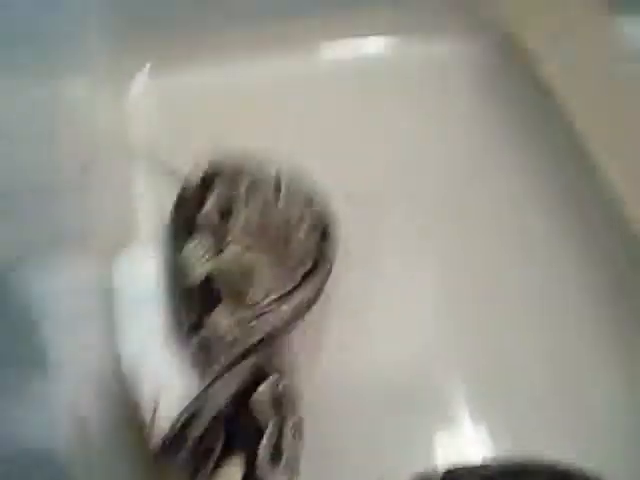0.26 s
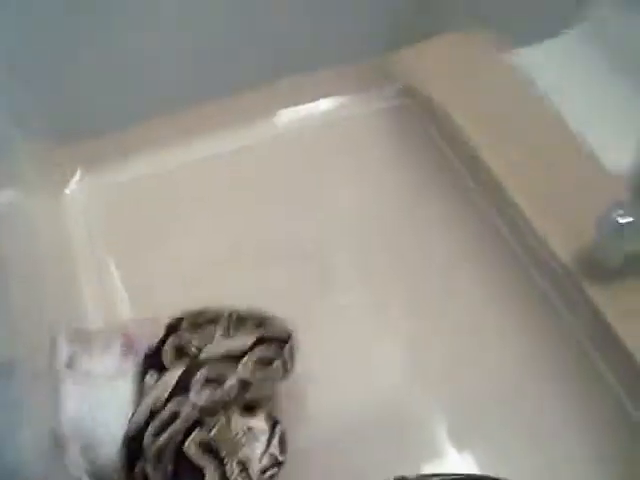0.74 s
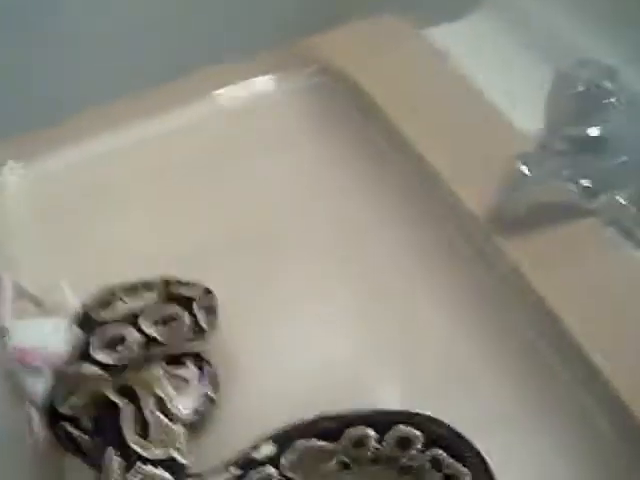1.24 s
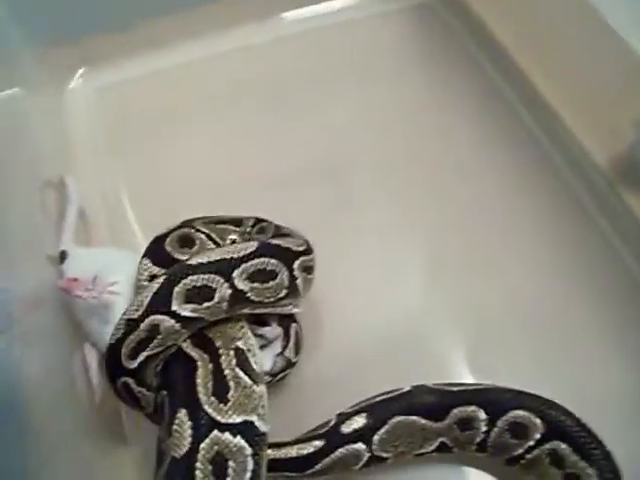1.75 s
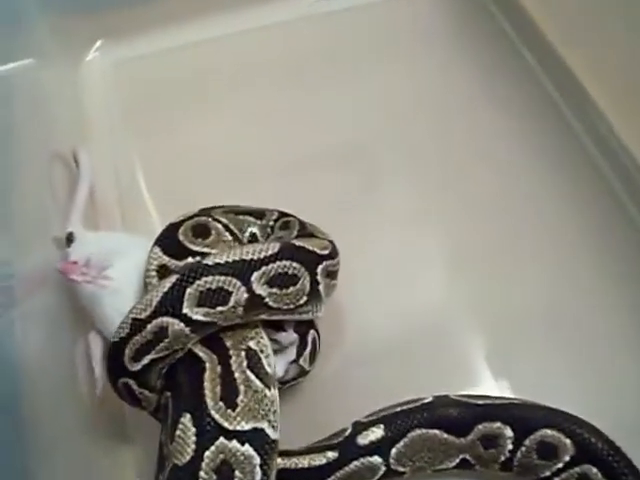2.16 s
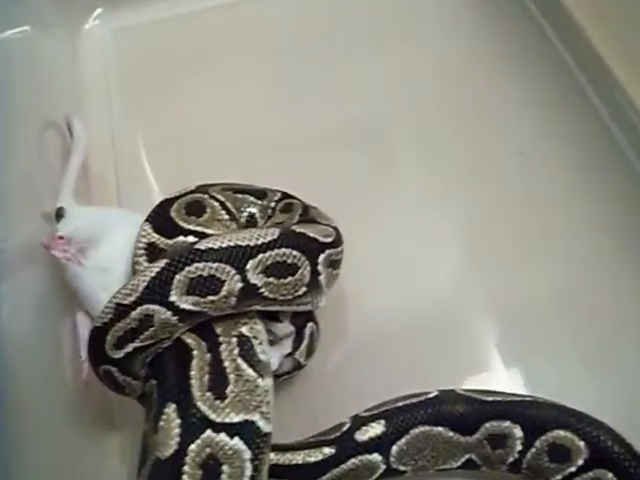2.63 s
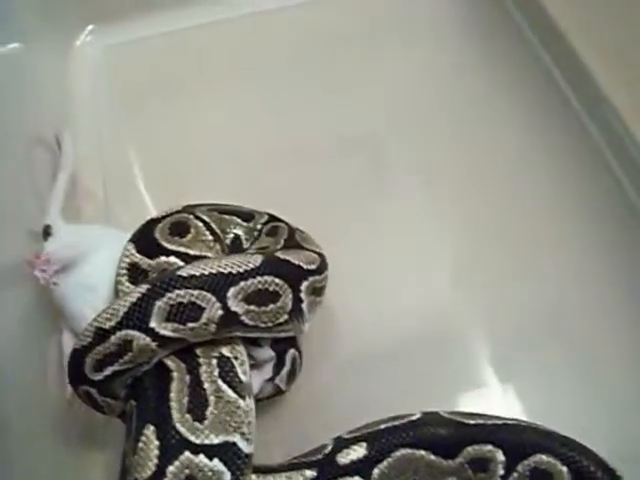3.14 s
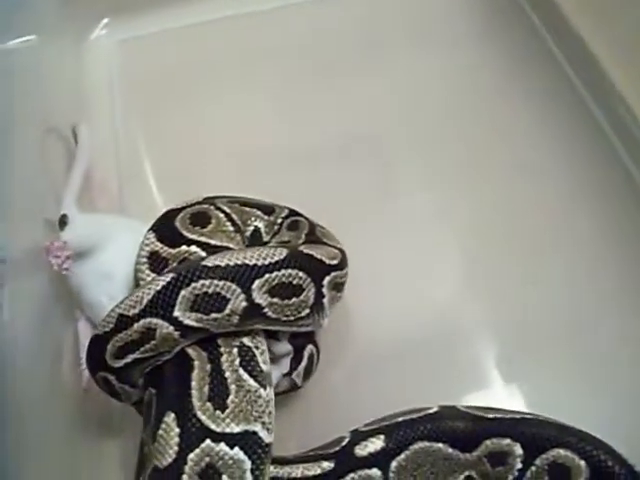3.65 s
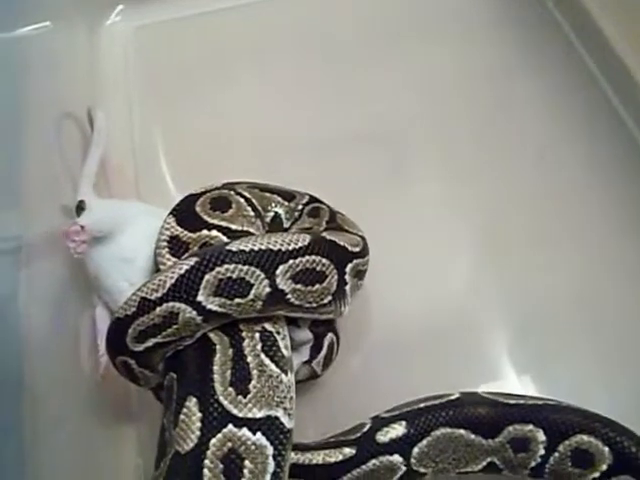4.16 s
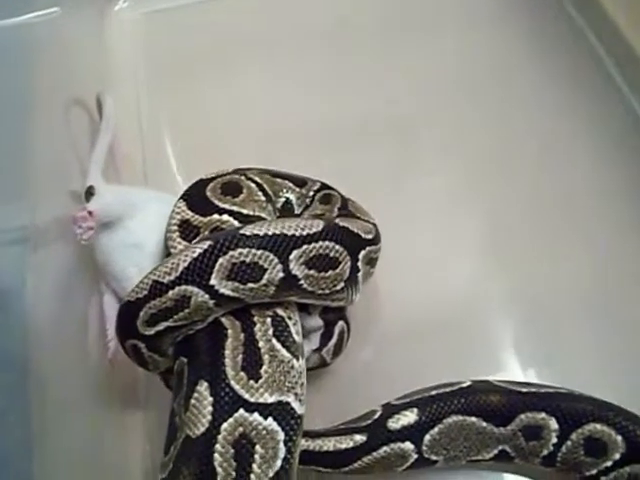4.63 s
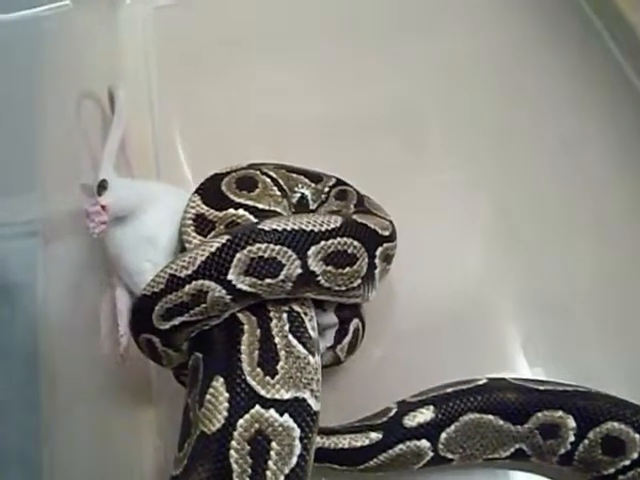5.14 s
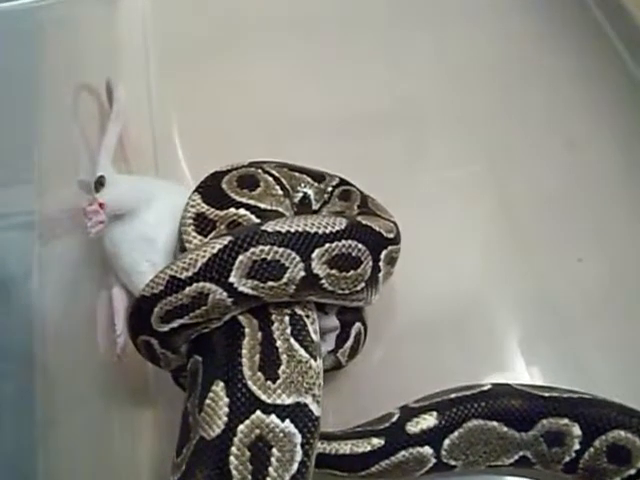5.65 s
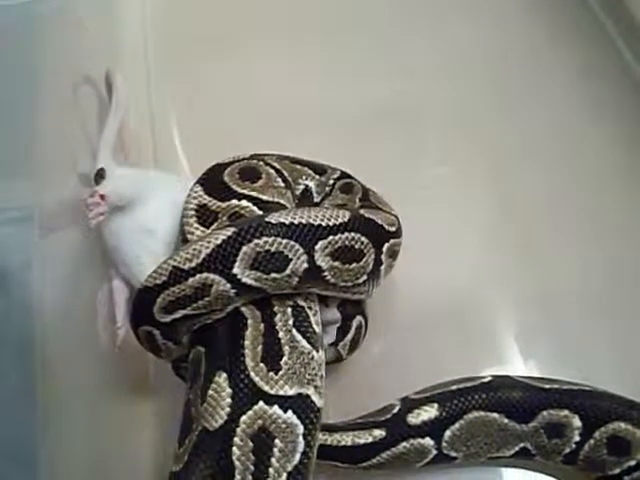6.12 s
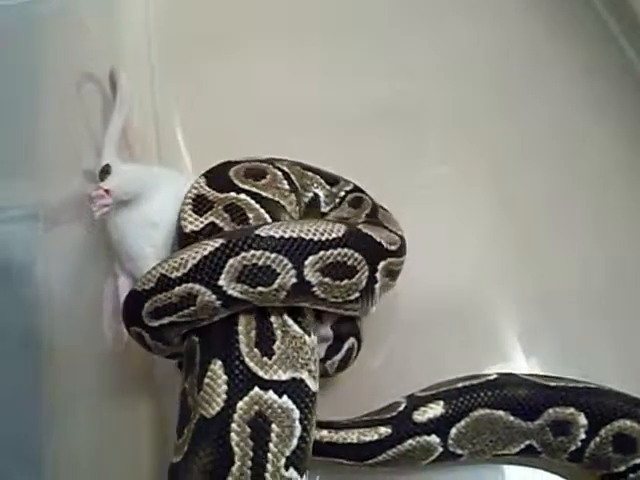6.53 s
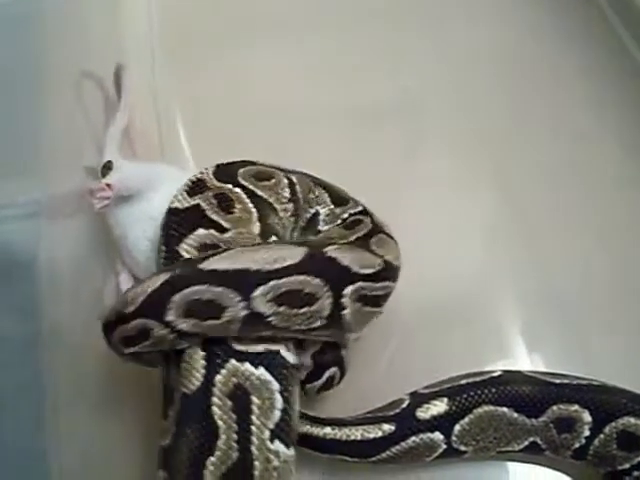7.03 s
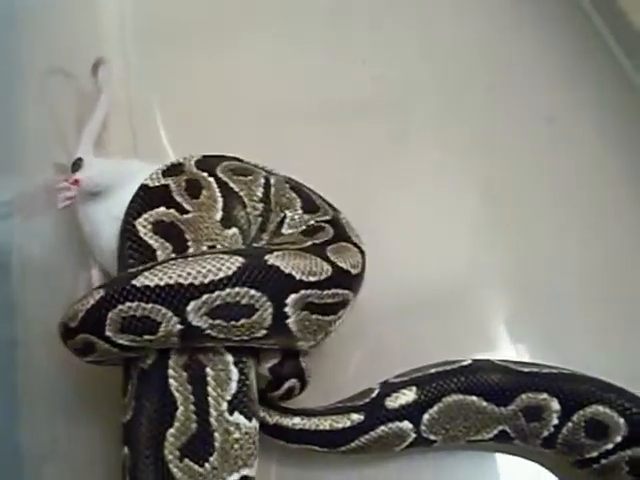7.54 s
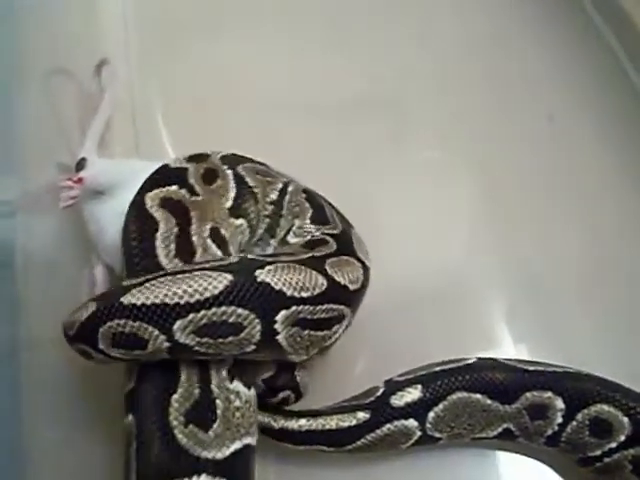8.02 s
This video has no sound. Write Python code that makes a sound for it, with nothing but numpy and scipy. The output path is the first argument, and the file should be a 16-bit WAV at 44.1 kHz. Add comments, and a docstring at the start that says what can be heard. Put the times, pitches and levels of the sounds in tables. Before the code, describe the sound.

A snake seizes a small rodent in a plastic tub. At about 0.1 seconds a harsh screech breaks out over hollow knocks, sharp claw ticks and soft sliding scales. More thumps and short squeaks follow until 0.8 seconds. A high squeal comes from 1 to 1.2 seconds with another knock and tick, and the scuffle fades to faint taps by 2 seconds. From 1.5 to 4.5 seconds the rodent gives brief, thin, quieter squeaks, about three a second, then a slightly longer one near 4.8. After a pause and one faint knock, five loud squeals come in a row from 6.3 to 8.2 seconds, each whistling and turning hoarse as its pitch drops. The sound is close and narrow in range, in a small hard room with faint hum and slight handling rumble near the end.

```python
"""Knocks, scrapes and a harsh screech: a snake seizes a small rodent in a plastic tub.
Bodies ring the tub's modes, claws tick, scales slide. The rodent's throat whistles short squeaks
and longer squeals that turn harsh where the pitch sags, ending with five loud squeals in a row.
Small hard room, faint hum, heard through a close, narrow-band pocket camera."""
import sys
import numpy as np
from scipy import signal
from scipy.fft import rfft, irfft, next_fast_len
from scipy.io import wavfile

SR = 44100
rng = np.random.default_rng(int(sys.argv[2]) if len(sys.argv) > 2 else 0)


def master_out(mix):
    """Clip the mix to full scale and print it as 16-bit PCM to the path in sys.argv[1]."""
    frames = np.transpose(np.atleast_2d(mix))
    ceiling = np.clip(frames, -1, 1)
    pcm = np.round(ceiling * 32767).astype(np.int16)
    wavfile.write(sys.argv[1], SR, pcm)


N = 365148
T = np.arange(N) / SR

# one curve per squeal: t/s, f/Hz, level/dB
SQUEAL_CURVES = [
    [(0.99, 3280, -30), (1.0, 3276, -27.5), (1.012, 3430, -29.5), (1.026, 3495, -24.5),
     (1.078, 3284, -28.5), (1.084, 3284, -28.5), (1.118, 3295, -30), (1.176, 3392, -28.5),
     (1.21, 3365, -28.5), (1.224, 2883, -31), (1.242, 2120, -40), (1.247, 2120, -41)],
    [(4.834, 3070, -41), (4.842, 3320, -36.5), (4.854, 3288, -37.5), (4.872, 3268, -30),
     (4.894, 3206, -38.5), (4.914, 3056, -30.5), (4.922, 2940, -36.5), (4.934, 2820, -36.5),
     (4.94, 2575, -51), (4.944, 2500, -50)],
    [(6.263, 3200, -36), (6.271, 3350, -34), (6.295, 3258, -27), (6.305, 3052, -22.5), (6.363, 3065, -23.5),
     (6.379, 2913, -31), (6.409, 3110, -20.5), (6.421, 2900, -29), (6.447, 3070, -24.5),
     (6.465, 2364, -24.5), (6.471, 2387, -38), (6.483, 2750, -25)],
    [(6.738, 2944, -25.5), (6.746, 2760, -22), (6.758, 3280, -22.5), (6.774, 3292, -18), (6.784, 3440, -25),
     (6.834, 3474, -24), (6.94, 3514, -26.5), (6.994, 3510, -33.5), (7.004, 3434, -25),
     (7.034, 3260, -20.5), (7.042, 2970, -26.5), (7.056, 3080, -30)],
    [(7.25, 3220, -27), (7.26, 3236, -19.5), (7.27, 3396, -22), (7.284, 3353, -19), (7.312, 3426, -27),
     (7.318, 3370, -19), (7.34, 3263, -19), (7.378, 3281, -25), (7.388, 3210, -19.5), (7.408, 3204, -34),
     (7.414, 3147, -32), (7.419, 2908, -33.5)],
    [(7.645, 3422, -27), (7.653, 3144, -26.5), (7.665, 3400, -25), (7.679, 3480, -37), (7.733, 3556, -30.5),
     (7.771, 3578, -38.5), (7.783, 3344, -23), (7.791, 3353, -22), (7.803, 3429, -35.5),
     (7.825, 3350, -22.5), (7.859, 2847, -35), (7.868, 2960, -25.5)],
    [(8.06, 3300, -28.5), (8.068, 3314, -21), (8.078, 3436, -36), (8.088, 3564, -27.5),
     (8.108, 3447, -33.5), (8.142, 3523, -31.5), (8.148, 3380, -28.5), (8.176, 3416, -34.5),
     (8.206, 3412, -37.5), (8.212, 3286, -23.5), (8.232, 3267, -33), (8.236, 3030, -24)],
]
# per squeal: hoarseness/0-1
SQUEAL_HOARSENESS = [.09, 0.017, .2, 0.18, 0.087, 0.066, 0.088]
# squeaks: t/s, length/s, f/Hz, level/dB, hoarseness/0-1,
# catch delay/s, catch half-width/s, catch drop/Hz, catch gain/dB, crack/0-1
SQUEAK_CALLS = [ (0.232, .041, 3143, -27.5, 0.14, .039, 0.0085, 619.6, -8, 0.5),
                (.391, 0.076, 3425, -33.5, 0.58, 0.064, 0.017, 262, -6, 0.34),
                (.743, 0.031, 3580, -42, 0.13, 0.0026, .007, 258.3, 4.5, 0.1),
                (1.496, 0.093, 3104, -44, 0.22, 0.042, 0.015, 40, 3, 0.05),
                (1.741, 0.028, 3378, -39, 0.21, 0.0075, 0.0055, 340, -3, 1),
                (2.038, 0.013, 3194, -29.5, 0.07, 0.011, .005, 280, -9.5, 0),
                (2.404, 0.051, 3453, -39, 0.08, .040, 0.015, 947, -1.5, 0.95),
                (2.731, 0.056, 3037, -36.5, 0.4, 0.024, 0.0084, 254, -4, 0.07),
                (3.138, 0.034, 3563, -42.5, 0.28, .024, 0.0088, 916, 7, 0.09),
                (3.453, 0.055, 3250, -37, 0.1, 0.012, 0.012, 442, 3, 0.37),
                (3.854, .026, 3430, -39, 0.11, 0.028, 0.0084, 783, -1, 0.2),
                (4.183, 0.027, 3360, -33, 0.08, 0.00086, .014, 325, -6.5, 0.1),
                (4.213, .063, 3105, -37.5, 0.08, 0.011, 0.0034, 218.5, 4, 0.13),
                (4.455, 0.032, 3465, -37, 0.14, 0.038, 0.021, 890, -3.5, 0.25)]
# throat resonances: f/Hz, width/Hz, level/dB
THROAT_FORMANTS = [(900, 1100, -11.5), (1640, 260, -2), (2467, 200, -4.5), (2860, 630, 2.5),
                   (5050, 810, 1.5)]
# throat gain on the second harmonic: f/Hz, level/dB
OCTAVE_GAIN = [(4200, -13), (4900, -5.5), (5500, 1), (6000, -2.5), (6300, -10.5), (6700, -21.5)]
# bodies hit the tub: t/s, peak level/dB, contact cutoff/Hz
BODY_BLOWS = [(.036, -62, 1500), (.075, -35.5, 1200), (.113, -23.5, 800), (.215, -20.5, 1425),
              (.247, -18, 1198), (0.495, -30.5, 190), (0.552, -48, 900), (0.608, -21, 900),
              (.795, -22, 700), (1.066, -44, 1100), (1.168, -31.5, 2960), (1.215, -38.5, 810),
              (1.427, -45, 1500), (1.688, -52.5, 2000), (1.874, -50, 2000), (5.931, -51.5, 1500)]
# tub modes: f/Hz, level/dB, t60/s
TUB_MODES = [(67.4, -20, 0.27), (137, -15, 0.027), (196, -10.5, 0.071), (257, -11.5, .27),
             (331.2, -10, 0.043), (425, -6, 0.083), (562, -5, .05), (622, -4, 0.066), (726.4, 2, 0.045),
             (947, 4, .04), (1236, -3.5, 0.012), (1770, -6, 0.035)]
# claws hit the plastic: t/s, peak level/dB
CLAW_HITS = [(.091, -28.5), (0.235, -12), (0.262, -23), (.445, -39), (0.529, -35), (.607, -19.5),
             (.671, -48), (0.702, -40.5), (0.936, -49.5), (1.169, -21.5), (1.363, -49), (1.429, -40.5),
             (1.461, -43.5), (1.514, -43.5), (1.88, -47), (2.019, -49), (2.112, -47.5)]
# claw tick spectrum: f/Hz, level/dB
CLAW_SPECTRUM = [(100, -7.5), (700, -5.5), (1500, 1.5), (2200, -1), (3200, 10), (4200, -2), (5200, 3.5),
                 (6500, -16)]
# the coils heave: t/s, hold/s, level/dB
COIL_HEAVES = [(0.108, .16, -45.5), (0.54, .04, -45.5), (0.798, .015, -51.5), (1.204, .015, -53)]
# scale friction spectrum: f/Hz, level/dB
SLIDE_SPECTRUM = [(25, -4), (70, -1.5), (130, -3.5), (260, -4.5), (400, -6), (800, -4), (1500, -12),
                  (3000, -15.5), (5500, -23)]
# wall reflections: delay/s, level/dB
WALL_ECHOES = [(.0046, -14), (0.0128, -12.5), (0.0244, -18)]
# room noise spectrum: f/Hz, level/dB
ROOM_SPECTRUM = [(20, 1), (45, -5), (70, 1.5), (100, -4), (200, -5), (450, -10), (900, -10.5), (1400, -14),
                 (2100, -22), (3000, -16), (4200, -22.5), (5500, -21.5), (7000, -23)]
# hum lines: f/Hz, level/dB
HUM_LINES = [(62, -72.5), (119, -82.5)]
# hand shifting on the camera: t/s, level/dB
HAND_CURVE = [(7.1, -80), (7.24, -57), (7.36, -57), (7.5, -85.5), (8.0, -80.5), (8.1, -64), (8.28, -69.5)]
# camera smoothing filter: f/Hz, level/dB
SMOOTHING_RESPONSE = [(20, 0.5), (5400, 0), (6000, -8.5), (6500, -25.5), (7200, -42.5), (8500, -50.5),
                      (9500, -55), (11500, -58.5), (14000, -60), (15500, -63)]


def rodent():
    """One throat makes the screech, the squeaks and the squeals."""
    air = throat_air()
    return screech(air) + squeaks(air) + squeals(air)


def squeals(air, pad_s=.002, gasp_drop_hz=125, gasp_lead_s=.008, gasp_half_s=.008):
    """Long arched cries; the pitch dips near the end as the air runs out."""
    out = np.zeros(N)
    for curve, hoarse in zip(SQUEAL_CURVES, SQUEAL_HOARSENESS):
        s, hz, db = np.transpose(curve)
        span = slice(int((s.min() - pad_s) * SR), int((s.max() + pad_s) * SR))
        t = T[span]
        pitch_hz = np.interp(t, s, hz) - gasp_drop_hz * bump(t, s.max() - gasp_lead_s, gasp_half_s)
        cry = whistle(pitch_hz, np.interp(t, s, db), hoarse, air[span],
                      crack=.13, octave_db=-18, air_db=-14.5, jitter=.027)
        add(out, t[0], cry)
    return out


def squeaks(air, scoop_hz=130, scoop_s=.0075):
    """Short whistles that scoop up, then break downward at a catch in the throat."""
    out = np.zeros(N)
    for s, length_s, hz, db, hoarse, catch_s, half_s, drop_hz, catch_db, crack in SQUEAK_CALLS:
        t = T[:int(length_s * SR)]
        catch = bump(t, catch_s, half_s, steepness=2.8)
        pitch_hz = hz - scoop_hz * np.exp(-t / scoop_s) - drop_hz * catch
        cry = whistle(pitch_hz, db + catch_db * catch, hoarse, air[int(s * SR):],
                      crack=crack, octave_db=-16, air_db=-13.5, jitter=.017)
        add(out, s, cry)
    return out


def whistle(hz, db, hoarse, air, crack, octave_db, air_db, jitter,
            onset_s=.015, clean_hz=3099, harsh_span_hz=918, strain_db=24, edge_s=.003):
    """Near-pure tone; rasp, at onset and low pitch, shakes it, lifts the octave and leaks air."""
    size = len(hz)
    t = T[:size]
    sag = np.maximum(clean_hz - hz, 0) / harsh_span_hz
    rasp = np.clip(hoarse + .14 * np.exp(-t / onset_s) + sag, 0, 1)
    waver = (.004 + .04 * rasp ** 2) * wobble(size, hz=112)
    shake = jitter * rasp * wobble(size, hz=503)
    phase = 2 * np.pi * np.cumsum(hz * (1 + waver + shake)) / SR
    octave = undb(octave_db + strain_db * rasp + np.interp(2 * hz, *np.transpose(OCTAVE_GAIN)))
    smear_rad = .17 * wobble(size, hz=430)
    tone = np.sin(phase) + octave * np.sin(2 * phase + smear_rad)
    # voice crack: every other cycle weakens
    tone += crack * rasp ** 2 * (np.sin(phase / 2) + .55 * np.sin(3 * phase / 2))
    tone *= 1 + .05 * rasp * wobble(size, hz=448)
    leak = hoarse + .37 * (rasp - hoarse)
    effort_db = .33 * (db + 23)  # air grows faster than the tone
    flutter_db = 3.5 * wobble(size, hz=200)
    turbulence = undb(air_db + effort_db + flutter_db) * leak * air[:size]
    gate = np.clip(np.minimum(t, t[-1] - t) / edge_s, 0, 1)
    return np.sqrt(2) * gate * undb(db) * (tone + turbulence)


def screech(air, hz=1740, jitter=.045, level_db=-35, tone_db=-3, air_db=-2):
    """At the strike the voice breaks an octave down and shakes in rushing air, with one surge."""
    phase = 2 * np.pi * np.cumsum(hz * (1 + jitter * wobble(N, hz=353))) / SR
    tone = np.sin(phase) + .5 * np.sin(2 * phase) + .5 * np.sin(3 * phase)
    surge_db = 6.5 * bump(T, centre_s=.156, half_s=.01485)
    effort = envelope(.109, hold_s=.12, attack_s=.0045, release_s=.0051) * undb(level_db + surge_db)
    flutter = 1 + .39 * wobble(N, hz=156)
    return effort * (undb(tone_db) * tone + undb(air_db) * air) * flutter


def throat_air():
    """Turbulence through the throat's resonances."""
    out = 0
    for hz, width_hz, db in THROAT_FORMANTS:
        b, a = signal.iirpeak(hz, hz / width_hz, SR)
        band = signal.lfilter(b, a, rng.standard_normal(N))
        out += undb(db) * signal.lfilter(b, a, band)
    return unit(out)


def body_knocks(rub_s=.0069, scatter_db=2, detune=.034):
    """A push and a short rub ring the tub; soft contact rings only the low modes."""
    out, t = np.zeros(N), T[:SR // 2]
    for s, db, contact_hz in BODY_BLOWS:
        push = .3 * rng.standard_normal(len(t)) * np.exp(-t / rub_s)
        push[0] += 2
        ring = 0
        for hz, mode_db, t60_s in TUB_MODES:
            share, shift = rng.standard_normal(2)  # weight on the wall shifts per blow
            decay = undb(mode_db + scatter_db * share - 60 * t / t60_s)
            ring += decay * np.cos(2 * np.pi * hz * (1 + detune * shift) * t)
        blow = lowpass(signal.fftconvolve(push, ring)[:len(t)], contact_hz)
        add(out, s, blow * undb(db) / np.abs(blow).max())
    return out


def claw_ticks(decay_s=.0037, tail_s=.0098, tail_db=-19):
    """A claw's sharp crack, then a brief rattle of the wall."""
    out, t = np.zeros(N), T[:SR // 10]
    for s, db in CLAW_HITS:
        decay = np.exp(-t / decay_s) + undb(tail_db) * np.exp(-t / tail_s)
        burst = decay * rng.standard_normal(len(t))
        tick = lowpass(colour(burst, CLAW_SPECTRUM), hz=6460, order=6)
        add(out, s, tick * undb(db) / np.abs(tick).max())
    return out


def scale_slide(catch_db=5.5, attack_s=.056, release_s=.13):
    """With each heave, scales catch and slip on the plastic."""
    friction = rng.standard_normal(N) * undb(catch_db * wobble(N, hz=60))
    heaves = [undb(db) * envelope(s, hold_s, attack_s, release_s) for s, hold_s, db in COIL_HEAVES]
    return np.max(heaves, axis=0) * unit(colour(friction, SLIDE_SPECTRUM))


def room(x, t60_s=.25, wet_db=-15, build_s=.014):
    """Close echoes and the short tail of a small hard room."""
    t = T[:SR // 2]
    tail = rng.standard_normal(len(t)) * undb(-60 * t / t60_s) * (1 - np.exp(-t / build_s))
    response = undb(wet_db) * tail / np.sqrt(np.sum(tail ** 2))
    response[0] += 1
    for delay_s, db in WALL_ECHOES:
        response[int(delay_s * SR)] += undb(db)
    return signal.fftconvolve(x, response)[:N]


def background(noise_db=-65, drift_db=.72):
    """Room noise, wavering hum and the rumble of a hand on the camera."""
    noise_gain = undb(noise_db + drift_db * wobble(N, hz=6.4))
    noise = noise_gain * unit(colour(rng.standard_normal(N), ROOM_SPECTRUM))
    hum = 0
    for hz, db in HUM_LINES:
        waver = 1 + .84 * wobble(N, hz=5)
        hum += undb(db) * unit(waver * np.sin(2 * np.pi * hz * T))
    hand_db = np.interp(T, *np.transpose(HAND_CURVE), left=-200, right=-200)
    return noise + hum + undb(hand_db) * wobble(N, hz=45)


def undb(db):
    """Decibels to gain."""
    return 10 ** (np.asarray(db) / 20)


def unit(x):
    """Scale to rms 1."""
    return x / np.sqrt(np.mean(x ** 2))


def colour(x, points):
    """Filter by (f/Hz, level/dB) points."""
    size = next_fast_len(len(x) + 2048)
    hz, db = np.transpose(points)
    bins_hz = np.maximum(np.fft.rfftfreq(size, 1 / SR), 1)
    gain = undb(np.interp(np.log(bins_hz), np.log(hz), db))
    return irfft(rfft(x, size) * gain, size)[:len(x)]


def lowpass(x, hz, order=2):
    """Maximally flat low-pass."""
    return signal.sosfilt(signal.butter(order, hz, fs=SR, output="sos"), x)


def wobble(size, hz):
    """Noise low-passed at hz, rms 1."""
    return unit(lowpass(rng.standard_normal(size), hz))


def envelope(s, hold_s, attack_s, release_s):
    """Exponential rise until time s, hold, decay."""
    return np.exp(np.minimum(T - s, 0) / attack_s - np.maximum(T - s - hold_s, 0) / release_s)


def bump(t, centre_s, half_s, steepness=2):
    """Bell of height 1; steeper is squarer."""
    return np.exp(-np.abs((t - centre_s) / half_s) ** steepness)


def add(out, s, x):
    """Mix x into out from time s."""
    i = int(s * SR)
    out[i:i + len(x)] += x[:max(N - i, 0)]


def scene():
    """Voice and struggle in the room, over the background."""
    struggle = rodent() + body_knocks() + claw_ticks() + scale_slide()
    return (room(struggle) + background())[None]


def record(dry, input_hz=6100, sampling_hz=12000, hiss_db=-97, top_hz=15750):
    """Camera: narrow band, faint mirror tones about its sampling rate, hiss, top cut."""
    band = lowpass(dry[0], input_hz, order=12)
    mirrored = band * (1 + 2 * np.cos(2 * np.pi * sampling_hz * T))
    x = colour(mirrored, SMOOTHING_RESPONSE) + undb(hiss_db) * rng.standard_normal(N)
    return signal.sosfilt(signal.ellip(10, .2, 70, top_hz, fs=SR, output="sos"), x)[None]


dry = scene()
out = record(dry)
master_out(out)
```